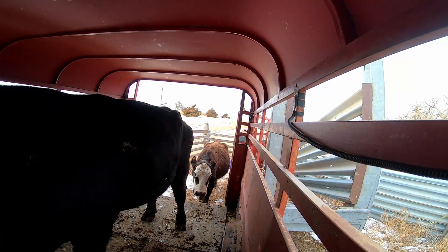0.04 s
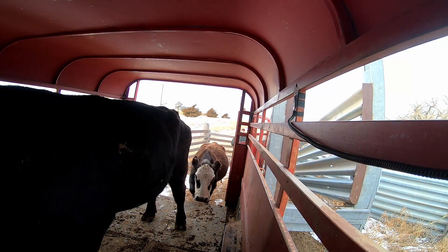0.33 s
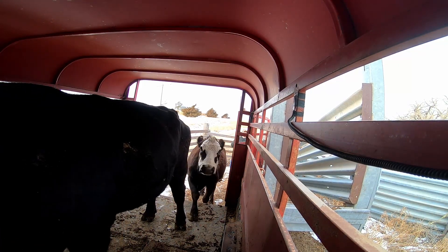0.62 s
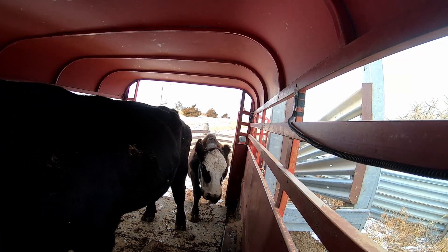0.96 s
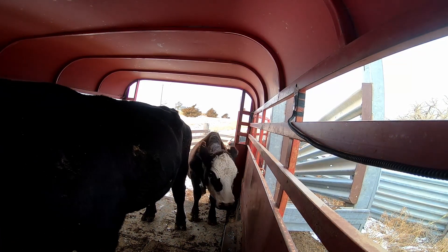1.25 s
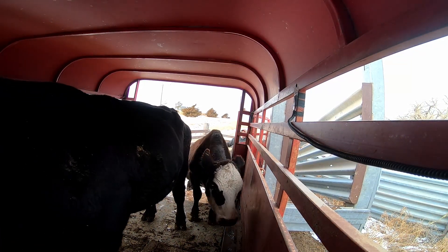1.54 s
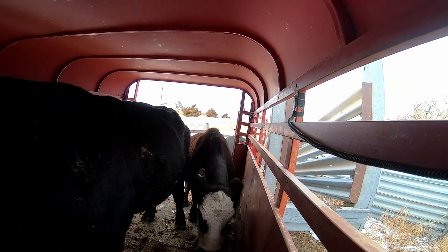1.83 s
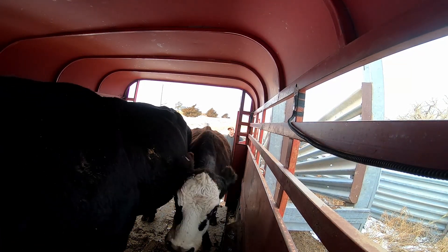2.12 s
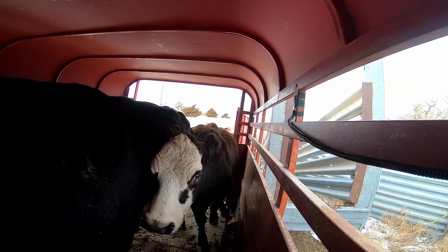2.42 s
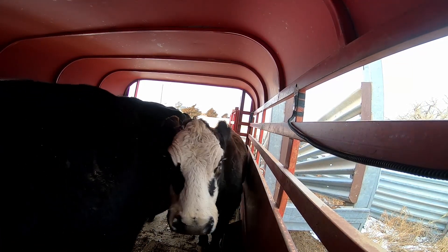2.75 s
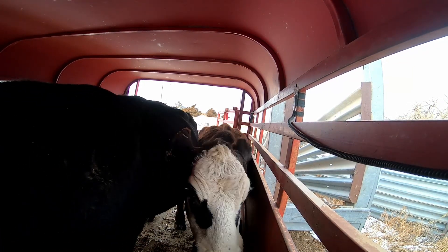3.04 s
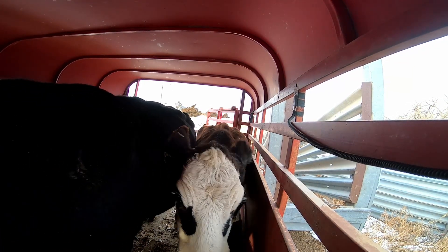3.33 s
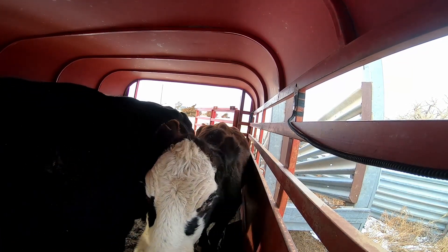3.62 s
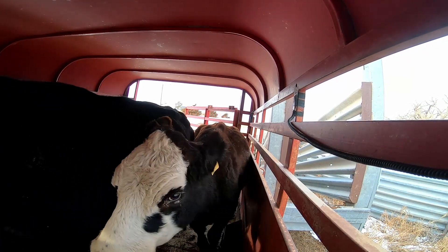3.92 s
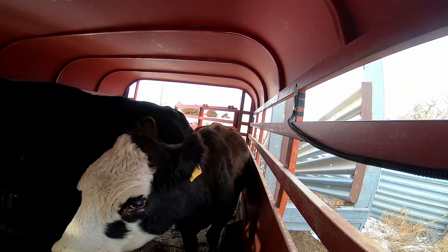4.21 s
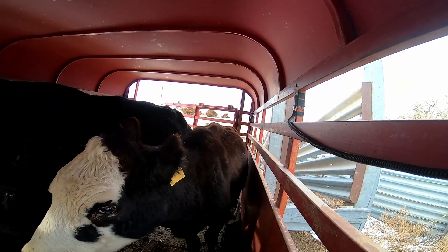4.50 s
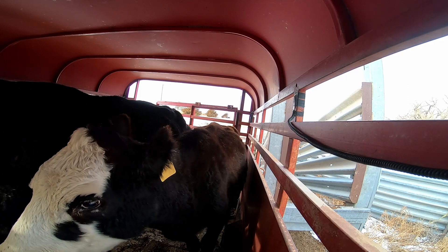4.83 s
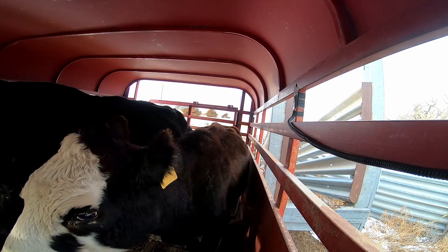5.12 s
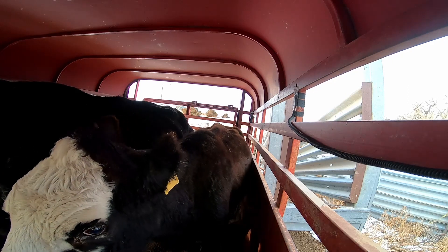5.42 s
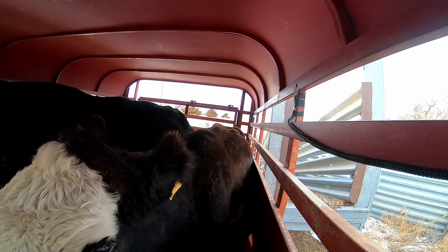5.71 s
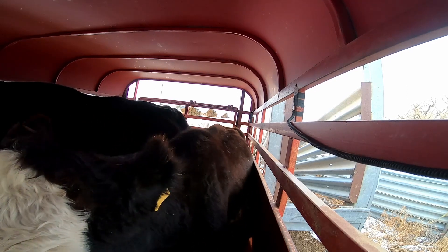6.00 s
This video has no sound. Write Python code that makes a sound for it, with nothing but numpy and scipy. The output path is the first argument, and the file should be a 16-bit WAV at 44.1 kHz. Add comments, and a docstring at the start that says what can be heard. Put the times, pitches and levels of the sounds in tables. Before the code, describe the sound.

Cattle step into a steel stock trailer, heard from the middle of it with a slightly hollow, close sound. Heavy hoof thuds land at about 0.6 and 1.7 seconds, each with a hollow knock, cracking grit and a ring from the steel shell. Hooves scrape between them, over a low rumble of shifting weight and lightly crunching bedding. A loose metal fitting clinks brightly at 2.1 seconds. Another step comes at 2.4 and a stronger scrape at 2.9, while the frame shudders deeply. From 3 to 5.5 seconds things are quieter: light steps, faint sniffs and hides rubbing a softly humming wall. At 5.7 seconds a hinge squeaks very briefly and the steel gate slams, the loudest sound, with a clang and a deep boom. It rattles in its latch until about 6.1 seconds, jolting the fitting again and leaving the walls ringing.

```python
"""Cattle walk into a steel stock trailer, heard from inside it.
First hooves thud and slide on the gritty floor, and the chassis shudders under the shifting weight.
About two seconds in, a loose fitting clinks. More steps follow; hides rub the walls and a cow sniffs.
Near the end a hinge squeaks, then the steel gate slams and rattles in its latch,
jolting the fitting again and leaving the walls ringing."""
import sys
import numpy as np
from scipy import signal
from scipy.io import wavfile

SR = 44100
rng = np.random.default_rng(int(sys.argv[2]) if len(sys.argv) > 2 else 0)


def dump_mix(stems):
    """Bounce the given channels to the path in sys.argv[1] as a 16-bit WAV at rate SR."""
    frames = np.atleast_2d(stems).T  # one column per channel
    limited = np.clip(frames, -1, 1)  # hard clip at full scale
    pcm = np.round(limited * 32767).astype(np.int16)
    wavfile.write(sys.argv[1], SR, pcm)


N = 271656
TIME = np.arange(N) / SR
AGE = TIME[:SR]   # the second after a blow
# Noise is shaped in 22 bands, from low to high. A "tone" table says how loud each band is.
EDGES = np.geomspace(18, 17000, 23)
CENTRES = np.sqrt(EDGES[1:] * EDGES[:-1])
BANK = [signal.butter(2, edge, "band", fs=SR, output="sos") for edge in zip(EDGES, EDGES[1:])]


# each step: (time [s], level [dB], rise [s], boom [dB], treble tilt [dB/octave], knock [Hz], knock [dB])
STEPS = [(0.564, -16, 0.0059, 2, -0.5, 502.4, 3.5), (1.135, -32, 0.00493, 12.5, 0, 553, 5.5),
         (1.200, -54, 0.0043, 15, 6, 319, -8), (1.688, -14, 0.0087, -5.5, -2, 718, -5),
         (2.202, -35.5, 0.0053, -1.5, 3.5, 387, 0), (2.438, -25, .005, 0, 1.5, 479, -6.5),
         (2.921, -31, 0.00606, -9.5, 1, 822, 0), (3.089, -40.5, 0.0026, -6, -12, 582, 6),
         (3.127, -41.5, 0.0048, -14, 6.5, 444, -5), (4.246, -39.5, 0.016, 4.5, 1, 380, -16),
         (4.391, -43, 0.0024, -8, 4, 1020, 2), (4.52, -49.5, 0.015, 5, -5, 390, -2),
         (5.357, -42, 0.00386, 3, -6, 405, -1), (5.593, -50, 0.0033, 4, 3, 413, 8.5)]
# tone of the thud: (pitch [Hz], level [dB])
THUD_TONE = [(20, -11), (38, -9), (70, 0), (140, -3), (230, -4), (330, -5.5), (520, -2), (950, -6),
             (1900, -13.5), (3800, -25), (8000, -33), (15000, -48)]
# how long the thud and the trailer's steel shell take to fade by 60 dB: (pitch [Hz], fade [s])
THUD_FADE = [(50, 0.22), (250, 0.24), (600, 0.14), (2000, 0.11), (12000, 0.084)]
SHELL_FADE = [(50, 1.1), (150, 1.71), (600, 0.51), (2500, 1.6), (12000, 0.42)]
# notes of the floor plate under a hoof: (pitch [times the knock pitch], level [dB], fade [s])
KNOCK_NOTES = [(1, 2, 0.094), (.76, -9.5, 0.26), (1.38, -7, 0.0877)]
# notes of the bending floor, and of the wall and roof panels: (pitch [Hz], level [dB], fade [s])
FLOOR_NOTES = [(73, -6, .2), (137.2, -3, 0.19)]
PANEL_NOTES = [(89, -19, .5), (120.7, -1, 4.7), (147.8, -2.5, 0.76), (156.9, -1.5, 2.1), (198, -2.5, 2.4),
               (265, -5.5, 0.82), (323, -0.5, 2), (438, -6.5, 3), (598, -11, 1), (684, -21, 2),
               (763, -4.5, 2.5), (901, -8.5, 2.2), (1063, -11, 1.7), (1131, -3.5, 1), (1210, -10, 1.32),
               (1257, 1.5, 0.53), (1330, -22, 2.5), (1394, -4, 1.4), (1488, -6, 0.98), (1830, -10, 0.41),
               (1904, -11, 0.58), (2014, -5, 0.55), (2035, -6, 0.64)]

def hooves(boom_hz=220, tilt_hz=700, shell_db=-16.5, panel_db=-32.5, toe_db=-13, thud_db=-3.5):
    """The toe touches, the weight lands with a hollow knock and thud, then the steel shell rings on."""
    out = np.zeros(N)
    lows = 1 / (1 + (CENTRES / boom_hz) ** 2)
    octaves_up = np.maximum(np.log2(CENTRES / tilt_hz), 0)
    for s, db, rise, boom_db, tilt, knock_hz, knock_db in STEPS:
        tone = per_band(THUD_TONE) + tilt * octaves_up
        boom = boom_db * lows
        toe = noisy_ring(tone + boom + toe_db - 12 * lows + 1.6 * octaves_up, fade=0.05, rise=0.0011)
        thud = noisy_ring(tone + boom + thud_db, per_band(THUD_FADE), rise)
        shell = noisy_ring(tone + 0.8 * boom + shell_db, per_band(SHELL_FADE), rise=0.02)
        knock = from_db(knock_db) * ring_notes(np.array(KNOCK_NOTES) * [knock_hz, 1, 1], vary_db=1.5)
        panels = from_db(panel_db) * ring_notes(PANEL_NOTES, vary_db=2.5)
        floor = from_db(boom_db) * ring_notes(FLOOR_NOTES, vary_db=1)
        add(out, s, from_db(db) * (toe + thud + shell))
        add(out, s + rise, from_db(db) * (knock + floor + panels))
    return out


# the gate strikes and rattles: (time [s], level [dB], rise [s], latch snap [dB])
GATE_HITS = [(5.727, -27, 0.0032, -68), (5.732, -20, 0.00392, -31), (5.780, -24.5, 0.0046, -23.5),
             (5.826, -34, 0.0039, -29.5), (5.905, -37, 0.00376, -33), (5.942, -34.5, 0.0051, -33),
             (6.019, -54, .004, -48), (6.10, -36, .015, -51)]
# tones of the clang, the latch's snap and the hardest hit's crack: (pitch [Hz], level [dB])
CLANG_TONE = [(35, -18), (70, -8.5), (130, -1.5), (200, -1.5), (300, -2.5), (550, -2.5), (800, -2.5),
              (1200, 1.5), (2000, -0.5), (3500, -2.5), (7500, -7.5), (10000, -15), (15000, -17)]
SNAP_TONE = [(1500, -6.5), (4000, -2), (7500, 3.5), (10000, -8.5), (13000, 0), (16000, -19)]
STRIKE_TONE = [(500, -20), (1150, 7.5), (1700, 3.5), (2600, -0.5), (5000, -1.5), (7500, -5), (10000, -22)]
# how long the clang lasts: (pitch [Hz], fade [s])
CLANG_FADE = [(60, 2.5), (200, 2.25), (1000, 1.83), (2500, 0.96), (6000, 0.798), (13000, 0.86)]
# notes of the latch bar: (pitch [Hz], level [dB], fade [s])
LATCH_NOTES = [(2456, -6, .4), (2670, -10, .25), (3940, -6, .3), (5470, -5.5, 1.2)]

def gate(clang_db=-1.5, panel_db=-20, latch_db=-9, strike_db=-21):
    """Each hit clangs and strikes the latch bar; the hardest also cracks and sets the panels ringing."""
    out = np.zeros(N)
    for s, db, rise, snap_db in GATE_HITS:
        add(out, s, from_db(db + clang_db) * noisy_ring(per_band(CLANG_TONE), per_band(CLANG_FADE), rise))
        add(out, s, from_db(snap_db) * noisy_ring(per_band(SNAP_TONE), fade=0.2, rise=rise))
        add(out, s + rise, from_db(snap_db + latch_db) * ring_notes(LATCH_NOTES, vary_db=1))
    s, _, rise, _ = max(GATE_HITS, key=lambda hit: hit[1])
    add(out, s, from_db(strike_db) * noisy_ring(per_band(STRIKE_TONE), fade=0.1, rise=rise))
    add(out, s + rise, from_db(panel_db) * ring_notes(PANEL_NOTES, vary_db=0.5))
    return out


# the gate heaves against its frame: (middle [s], half length [s], level [dB], pitch [Hz])
GATE_HEAVES = [(5.775, 0.028, -14, 92.9), (5.92, 0.02, -11, 116)]

def gate_boom():
    """The heavy gate gives a short, deep boom as it presses on its frame."""
    return sum(from_db(db) * swell(s, half) * np.sin(2 * np.pi * (hz * TIME + rng.random()))
               for s, half, db, hz in GATE_HEAVES)


# hooves and flanks slide on the steel: (start [s], length before the tail [s], level [dB])
SKIDS = [(0.363, 0.26, -45), (0.62, 0.09, -39), (0.707, 0.088, -33), (0.905, .07, -41), (1.832, 0.12, -40),
         (2.386, 0.058, -33.5), (2.775, 0.33, -36.5), (2.918, 0.07, -23.5), (3.177, 0.092, -42.5),
         (3.57, .05, -49.5), (3.69, 0.064, -47.5), (3.976, 0.047, -46), (4.107, 0.11, -44),
         (4.385, 0.088, -36.5), (4.712, 0.3, -56.5)]
# tone of the scrape: (pitch [Hz], level [dB])
SCRAPE_TONE = [(100, -2), (300, 4), (600, 5.5), (1200, 5.5), (2000, -1.5), (3500, -15.5), (7500, -21),
               (10000, -47), (15000, -61)]

def slides():
    """Hoof and hide judder over the steel in many tiny slips."""
    return slide_pressure() * tiny_slips(per_s=900, vary_db=4.5, tone=SCRAPE_TONE, fade=0.21)


def slide_pressure():
    """Each slide catches quickly, holds and eases off."""
    stages = np.array([0, 0.08, 0.55, 1, 1.5])
    pressure = [0.00081, 0.59, 0.75, 0.32, 0.0033]
    return sum(from_db(db) * np.interp(TIME, s + length * stages, pressure) for s, length, db in SKIDS)


# the trailer's frame shakes: (middle [s], half length [s], level [dB])
FRAME_SHAKES = [(0.705, 0.12, -31.5), (1.248, 0.084, -37.5), (2.32, 0.084, -28), (3.21, 0.21, -31),
                (4.42, 0.16, -29.5), (5.86, 0.096, -39)]

def chassis(shudder_hz=26.8, waver=0.051):
    """The frame flexes under the shifting weight, sounding its lowest note with a slight wobble."""
    hz = shudder_hz * (1 + waver * drift(36))
    return swells(FRAME_SHAKES) * np.sin(2 * np.pi * np.cumsum(hz) / SR)


# larger crumbs crack as the weight rolls on: (time [s], level [dB])
CRUMBS = [(0.0273, -38), (0.6248, -22.5), (0.7056, -26), (0.8149, -28), (0.904, -32), (1.8364, -27),
          (1.8968, -30), (2.386, -25.5), (2.6444, -36), (3.1285, -35), (3.196, -35), (3.24, -33.5),
          (3.3524, -38.5), (3.3872, -41), (4.33, -37), (4.811, -41), (4.996, -41.5)]
# tone of one crack: (pitch [Hz], level [dB])
CRACK_TONE = [(900, -33), (2000, -2), (3800, -10), (7500, -7.5), (14000, -12.5)]

def grit(snap_db=-13, scatter_db=-20):
    """A dry crumb snaps and scatters under every step, and now and then between steps."""
    out = np.zeros(N)
    under_hooves = [(s, -24.5 + 0.43 * db) for s, db, *_ in STEPS]   # heavier steps crack louder
    for s, db in under_hooves + CRUMBS:
        add(out, s, from_db(db + snap_db) * noisy_ring(per_band(CRACK_TONE), fade=0.02, rise=0.00035))
        add(out, s, from_db(db + scatter_db) * noisy_ring(per_band(CRACK_TONE), fade=0.16, rise=0.0061))
    return out


# the loose fitting clinks, and again when the gate jolts it: (time [s], level [dB])
FITTING_TAPS = [(2.0571, -31.5), (2.0615, -38), (5.782, -34), (5.943, -35)]
# its notes: (pitch [Hz], level [dB], fade [s])
FITTING_NOTES = [(650, -0.5, 0.33), (872, -9, 0.42), (1452, -13, 0.35), (2080, -14, 0.16), (3550, -5, 0.13),
                 (3790, -5, 0.14), (4100, -8, .12), (6248, 5, 0.049), (7030, -2, 0.084), (8550, 0, 0.082),
                 (9400, -4.5, 0.1)]
# tone of its spray of echoes: (pitch [Hz], level [dB])
SPRAY_TONE = [(400, -7.5), (800, 1.5), (2000, -8.5), (4000, -4), (7000, -7), (10000, -6.5), (15000, -19)]

def fitting(tick_hz=(13200, 15000), tick_s=0.001, tick_db=9, spray_db=-4, ring_db=-3):
    """Steel taps steel: a very bright tick, a spray of close echoes and a few clear notes."""
    out = np.zeros(N)
    tick = band_noise(band_filter(tick_hz), SR) * np.exp(-(AGE / tick_s - 1) ** 2)
    tick *= np.sqrt(tick_s * SR / np.sum(tick ** 2))
    for s, db in FITTING_TAPS:
        spray = noisy_ring(per_band(SPRAY_TONE) + spray_db, fade=0.16, rise=0.0028)
        ring = from_db(ring_db) * ring_notes(FITTING_NOTES, vary_db=1.5)
        add(out, s, from_db(db) * (from_db(tick_db) * tick + spray + ring))
    return out


# how restless the animals are: (time [s], level [dB])
RESTLESSNESS = [(0.0, -37.5), (0.36, -42), (0.76, -35), (1.69, -46.5), (1.87, -39), (2.29, -41),
                (3.07, -37), (3.43, -41.5), (4.49, -46), (5.13, -49.5), (5.68, -45.5)]
# a hoof presses into the bedding: (middle [s], half length [s], level [dB])
BEDDING_PRESSES = [(0.02, 0.03, -47.5), (0.45, 0.15, -51.5), (0.64, 0.12, -45), (1.82, 0.11, -48.5),
                   (2.43, 0.17, -53.5), (2.88, 0.14, -46), (4.28, 0.047, -63), (4.83, 0.17, -57)]
# tones of the rumbling floor, the rubbing hides and the bedding: (pitch [Hz], level [dB])
RUMBLE_TONE = [(22, 3), (45, -2.5), (80, 2.5), (160, -3), (240, -1), (400, -17.5), (900, -26)]
RUB_TONE = [(140, -37), (260, 0.5), (380, 1.5), (600, -0.5), (1100, -6), (2000, -13.5), (3300, -24),
            (6000, -51), (12000, -39)]
BEDDING_TONE = [(1200, -5), (3000, -2), (5000, -1), (8000, -1.5), (10500, -6.5), (15000, -7)]

def shuffling(rumble_db=-2, rub_db=-54, rustle_db=-21, slide_floor_db=-7.5, slide_wall_db=-5):
    """Shifting weight rumbles and hides rub the walls, more so after a slide; bedding crunches."""
    restless_db = np.interp(TIME, *np.transpose(RESTLESSNESS))
    rubbing = from_db(rub_db + 1.34 * (restless_db - restless_db.mean()))
    shaken = ring_out(slide_pressure(), fade=1.25)
    # hypot adds the power of two levels
    rumble = np.hypot(from_db(rumble_db + restless_db), from_db(slide_floor_db) * shaken)
    rumble *= friction(RUMBLE_TONE, flutter_db=1.5)
    rub = np.hypot(rubbing, from_db(slide_wall_db) * shaken)
    rub *= tiny_slips(per_s=1600, vary_db=4, tone=RUB_TONE, fade=0.22)
    bedding = np.hypot(from_db(rustle_db + restless_db), swells(BEDDING_PRESSES)) * crunch()
    return rumble + rub + bedding


def crunch(per_s=200, vary_db=1.5, crumb_s=0.014):
    """Crumbs of bedding break at random, each a short puff of noise."""
    breaks = uneven_sizes(vary_db) * (rng.random(N) < per_s / SR)
    power = signal.lfilter([1], [1, -np.exp(-1 / (crumb_s * SR))], breaks ** 2 + 1e-18)
    return level_one(np.sqrt(power) * friction(BEDDING_TONE, flutter_db=3.5))


# a flank leans on the side wall: (middle [s], half length [s], level [dB])
WALL_LEANS = [(3.06, .17, -50), (4.05, 0.67, -47.5), (4.43, 0.19, -53), (5.42, 0.093, -51)]
# notes of that wall: (pitch [Hz], width [Hz], level [dB])
WALL_NOTES = [(189, 9.2, 3), (286.4, 8.2, 6.5), (357.3, 8.6, 4.5), (394.6, 6.5, 7.5), (533, 21, -5.5),
              (738, 17, -4.5), (1065, 12, -5), (1324, 7, -6)]

def wall_drone(flutter_db=2):
    """Rubbing keeps the wall panel humming at its own notes."""
    noise = rng.standard_normal(N)
    drone = sum(from_db(db + flutter_db * drift(10)) * resonance(noise, hz, width)
                for hz, width, db in WALL_NOTES)
    return swells(WALL_LEANS) * level_one(drone)


# the squeak just before the gate lands: (middle [s], half length [s], level [dB])
HINGE_SLIPS = [(5.7, 0.013, -54.5)]
# notes of the hinge: (pitch [Hz], width [Hz], level [dB])
HINGE_NOTES = [(2300, 350, -1), (3950, 130, -3), (5100, 300, -12), (6500, 300, -19)]

def hinge():
    """The dry hinge slips once and squeaks briefly."""
    noise = rng.standard_normal(N)
    squeak = sum(from_db(db) * level_one(resonance(noise, hz, width)) for hz, width, db in HINGE_NOTES)
    return swells(HINGE_SLIPS) * squeak


# sniffs and brushing hides: (middle [s], half length [s], level [dB], pitch [Hz], width [octaves])
HISSES = [(0.076, 0.18, -67, 7800, 0.36), (2.61, 0.054, -59, 5150, .9), (2.985, 0.053, -50.5, 7100, 0.25),
          (3.307, 0.16, -59.5, 2490, 0.21), (3.64, 0.105, -66, 8150, 0.4), (3.86, 0.079, -61, 7540, 0.64),
          (4.15, 0.045, -57.5, 2350, 0.27), (4.775, 0.17, -70, 7740, 0.56), (5.327, 0.041, -59, 1380, 1.3),
          (5.348, 0.028, -61, 6230, 0.46)]

def sniffs_and_brushes(flutter_db=3.5):
    """Soft hisses, each around its own pitch: a cow sniffing close by, and hides brushing the walls."""
    out, noise = np.zeros(N), rng.standard_normal(N)
    for s, half, db, hz, octaves in HISSES:
        edges = np.minimum(hz * 2 ** (octaves * np.array([-0.5, 0.5])), 0.45 * SR)
        hiss = level_one(signal.sosfilt(band_filter(edges), noise))
        out += from_db(db) * swell(s, half) * hiss
    return out * from_db(flutter_db * drift(50))


# close echoes from wall, roof and floor: (delay [s], level [dB])
ECHOES = [(.0019, -32), (.0047, -26.5), (.0083, -22.5), (0.0138, -26)]

def trailer(sound):
    """Sound bounces off bare steel on all sides and turns slightly hollow."""
    out = sound.copy()
    for delay, db in ECHOES:
        add(out, delay, from_db(db) * sound)
    return out / np.sqrt(1 + sum(from_db(db) ** 2 for _, db in ECHOES))


# a faint, scattered side signal, mostly in the treble: (pitch [Hz], level [dB])
SIDE_TONE = [(100, -84), (1000, -61), (2000, -62), (4000, -28.5), (8000, -25), (14000, -21)]

def stereo(sound):
    """A faint, smeared copy is added on the left and taken away on the right."""
    scatter = noisy_ring(per_band(SIDE_TONE) + 10 * np.log10(CENTRES), fade=0.18, rise=0)
    side_power = np.sum(from_db(per_band(SIDE_TONE)) ** 2 * CENTRES) / CENTRES.sum()
    side = signal.oaconvolve(sound, scatter * np.sqrt(side_power / np.sum(scatter ** 2)))[:N]
    return np.array([sound + side, sound - side])


def noisy_ring(band_db, fade, rise):
    """Countless notes blur into noise: each band grows for `rise` s, then drops 60 dB in `fade` s."""
    fade = fade * np.ones(len(BANK))
    age = AGE[:int(SR * (fade.max() + rise))]
    attack = np.minimum(age / max(rise, 1 / SR), 1) ** 2
    out = np.zeros(SR)
    for band, db, band_fade in zip(BANK, band_db, fade):
        shape = attack * np.exp(-np.log(1000) * np.maximum(age - rise, 0) / band_fade)
        burst = level_one(band_noise(band, len(age)) * shape)
        out[:len(age)] += from_db(db) * np.sqrt(np.mean(shape ** 2)) * burst
    return out


def ring_notes(table, vary_db):
    """Struck steel rings in clear, fading notes; every blow mixes them a little differently."""
    hz, db, fade = np.transpose(table)[:, :, None]
    strength = from_db(db + vary_db * rng.standard_normal(hz.shape)) * rng.choice([-1, 1], hz.shape)
    notes = strength * np.exp(-np.log(1000) * AGE / fade) * np.sin(2 * np.pi * hz * AGE)
    return notes.sum(axis=0) * np.minimum(10 * (1 - AGE), 1)   # end without a click


def tiny_slips(per_s, vary_db, tone, fade, spots=6):
    """Surfaces catch and slip at several spots, each spot with its own brief ring."""
    out = np.zeros(N)
    for _ in range(spots):
        sizes = uneven_sizes(vary_db) * rng.choice([-1, 1], N)
        clicks = sizes * (rng.random(N) < per_s / spots / SR)
        out += signal.oaconvolve(clicks, noisy_ring(per_band(tone), fade, rise=0))[:N]
    return level_one(out)


def friction(tone, flutter_db):
    """Unbroken rubbing noise whose bands flutter separately."""
    return level_one(sum(from_db(db + flutter_db * drift(25)) * level_one(band_noise(band, N))
                         for band, db in zip(BANK, per_band(tone))))


def ring_out(gain, fade):
    """The level of something that stores the energy fed to it and loses it slowly."""
    kept = from_db(-60 / (fade * SR)) ** 2
    return np.sqrt(signal.lfilter([1 - kept], [1, -kept], gain ** 2 + 1e-18))


def resonance(noise, hz, width):
    """Pick one breathy note out of noise."""
    return signal.lfilter(*signal.iirpeak(hz, hz / width, fs=SR), noise)


def swell(s, half):
    """A smooth rise and fall around time `s`."""
    return np.exp(-np.minimum(((TIME - s) / half) ** 2, 50))


def swells(rows):
    """Several swells added up, each at its own level."""
    return sum(from_db(db) * swell(s, half) for s, half, db in rows)


def uneven_sizes(vary_db):
    """Random strengths: many small, a few large."""
    return from_db(vary_db * np.minimum(rng.exponential(1, N), 4))


def drift(per_s):
    """Glide to a new random value `per_s` times a second."""
    return np.interp(TIME * per_s, np.arange(2000), rng.standard_normal(2000))


def band_filter(edges):
    """A filter that lets through what lies between two pitches."""
    return signal.butter(2, edges, "band", fs=SR, output="sos")


def band_noise(band, size):
    """One band of noise, already running when it starts."""
    return signal.sosfilt(band, rng.standard_normal(size + SR // 10))[-size:]


def per_band(table):
    """Read a (pitch [Hz], value) table at the centre of each band."""
    hz, value = np.transpose(table)
    return np.interp(np.log(CENTRES), np.log(hz), value)


def from_db(db):
    """Turn decibels into a multiplier."""
    return 10 ** (np.asarray(db) / 20)


def level_one(x):
    """Scale to an average (rms) level of 1."""
    return x / np.sqrt(np.mean(x ** 2) + 1e-20)


def add(out, s, sound):
    """Mix a sound in at time `s`."""
    start = max(int(s * SR), 0)
    out[start:start + len(sound)] += sound[:N - start]


def scene():
    """Everything is heard from the middle of the trailer."""
    cattle = hooves() + slides() + shuffling() + sniffs_and_brushes() + grit()
    inside = trailer(cattle + fitting() + hinge() + gate())
    return stereo(inside + chassis() + wall_drone() + gate_boom())


def record(dry, hiss_db=-78, ceiling=1.2, cutoff_hz=15600):
    """Add faint microphone hiss, round off the peaks and cut the highest treble."""
    hiss = from_db(hiss_db) * rng.standard_normal(N)
    rounded = ceiling * np.tanh((dry + hiss) / ceiling)
    return signal.sosfilt(signal.ellip(12, 0.1, 80, cutoff_hz, fs=SR, output="sos"), rounded)


dry = scene()
out = record(dry)
dump_mix(out)
```